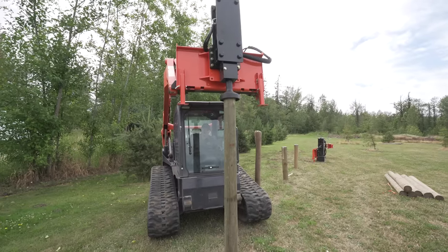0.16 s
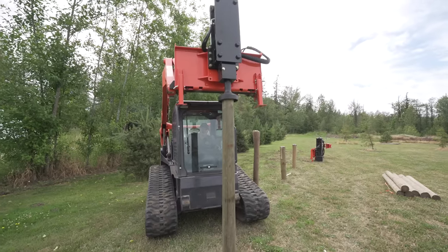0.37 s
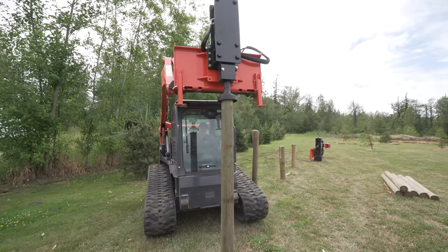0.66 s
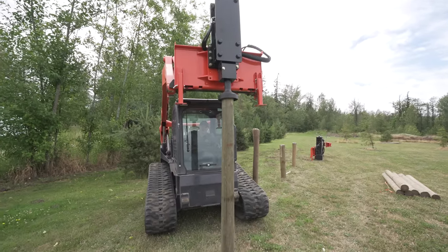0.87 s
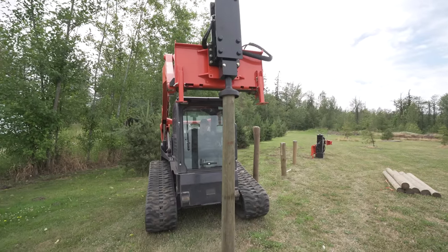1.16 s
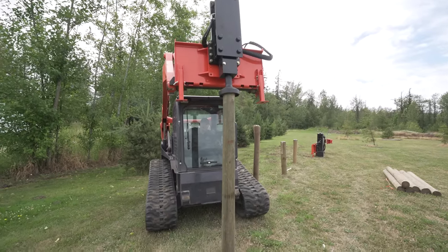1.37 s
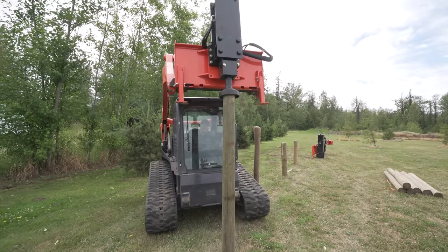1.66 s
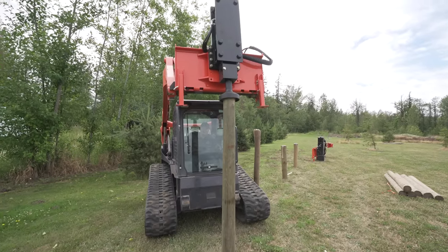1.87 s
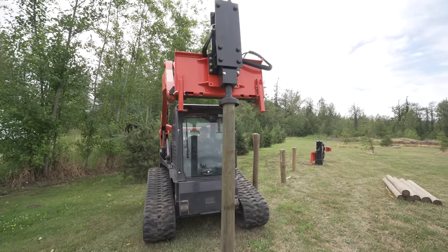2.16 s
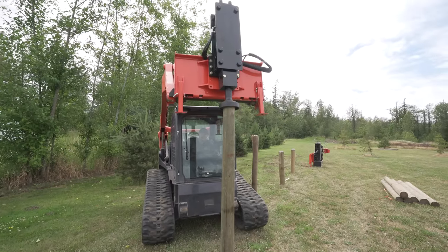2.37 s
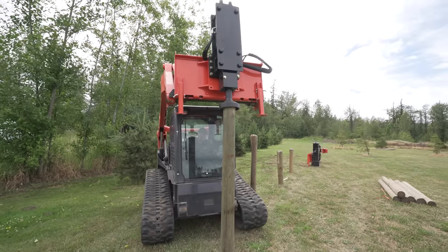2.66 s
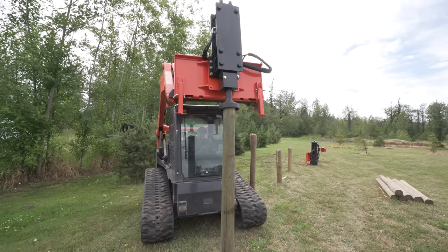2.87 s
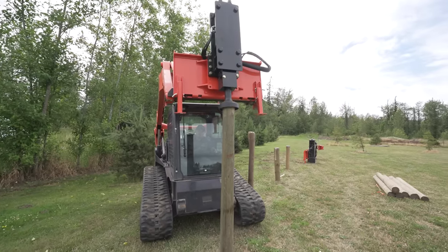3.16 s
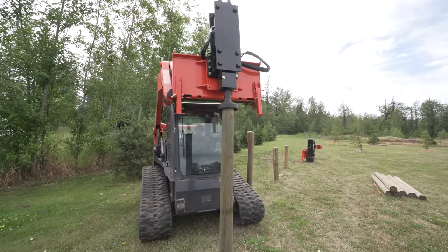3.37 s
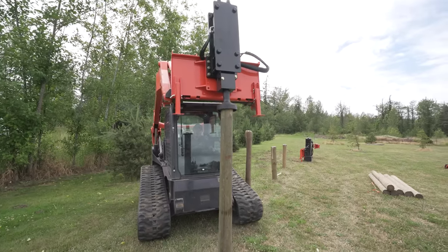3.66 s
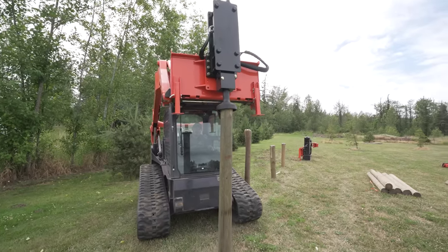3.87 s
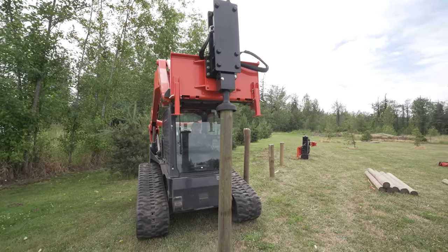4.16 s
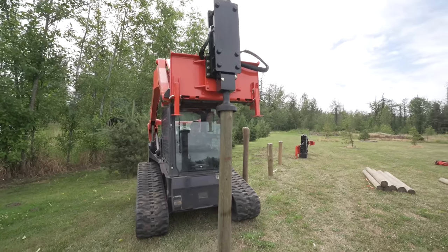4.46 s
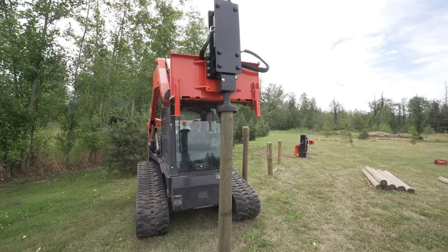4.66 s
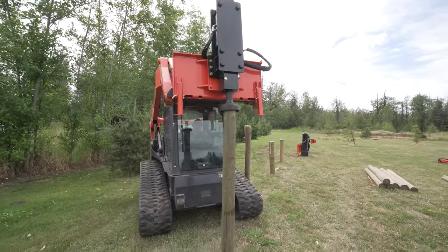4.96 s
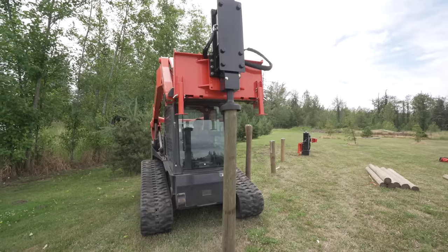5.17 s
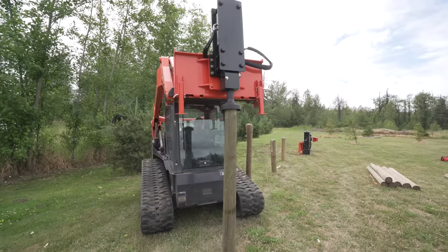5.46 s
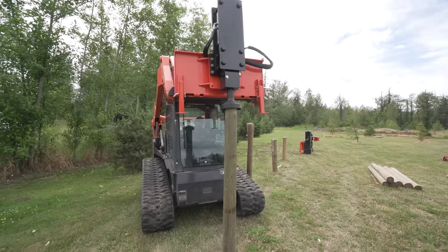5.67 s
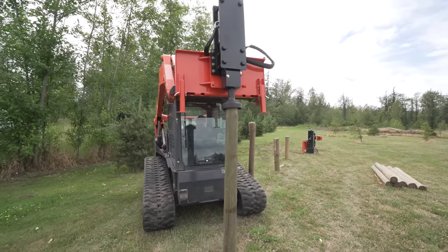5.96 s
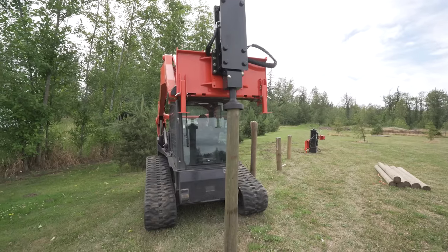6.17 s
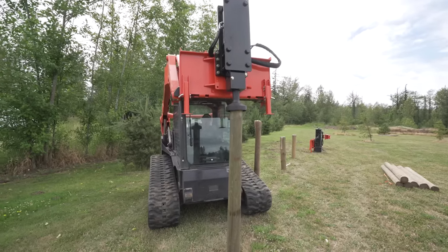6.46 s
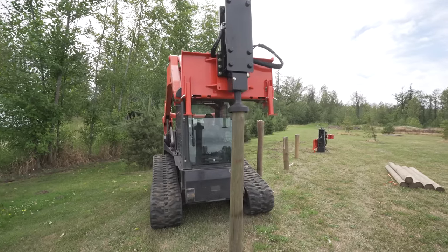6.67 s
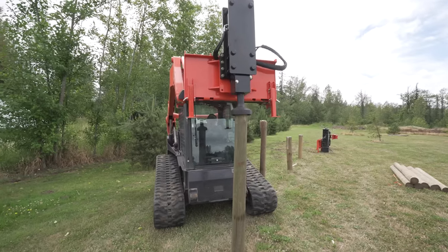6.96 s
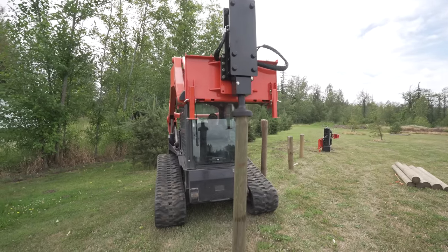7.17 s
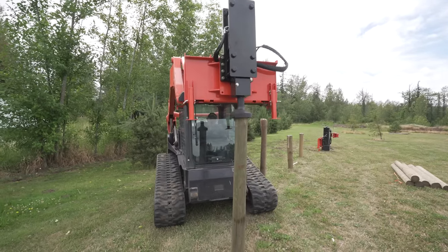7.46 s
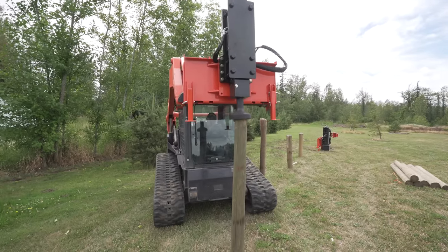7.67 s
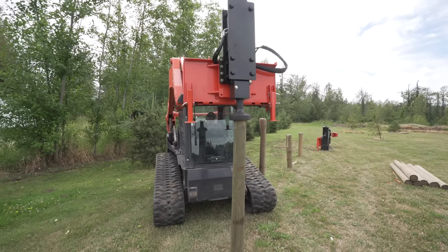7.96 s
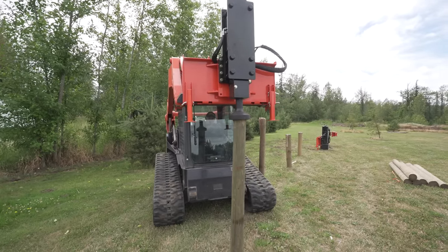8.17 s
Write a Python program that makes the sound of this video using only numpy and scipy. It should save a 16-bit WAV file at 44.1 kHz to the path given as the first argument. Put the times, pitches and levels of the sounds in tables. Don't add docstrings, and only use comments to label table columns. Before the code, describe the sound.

Outdoors and fairly close, a hydraulic hammer on a loader pounds a post in rapid clattering metal blows. A short burst stops, steel rings out over a low diesel idle and falling pump whine, then a long louder burst follows. After two separate blows and a pause, a final burst runs nearly to the end, finishing with loose clanks and ringing.

```python
import sys
import numpy as np
from scipy import signal
from scipy.fft import rfft, irfft, next_fast_len
from scipy.io import wavfile

SR = 44100
rng = np.random.default_rng(int(sys.argv[2]) if len(sys.argv) > 2 else 0)


def gain_from_db(level_db):
    decades = np.asarray(level_db, float) / 20
    return 10 ** decades


def pcm_store(signal):
    levels = np.round(np.clip(np.atleast_2d(signal), -1, 1) * 32767)
    wavfile.write(sys.argv[1], SR, levels.astype(np.int16).T)


N = 367353


def rms_one(x):
    return x / np.sqrt(np.mean(x ** 2) + 1e-20)


def in_time(rows, s=None):
    at, *columns = np.transpose(rows)
    when = np.arange(N) / SR if s is None else s
    return [np.interp(when, at, column) for column in columns]


def at_hz(points, hz):
    points_hz, values = np.array(points)[:, 0], np.array(points)[:, 1]
    return np.interp(np.log(hz), np.log(points_hz), values)


def resonate(x, hz, width_hz):
    r = np.exp(-np.pi * width_hz / SR)
    zeros = np.array([1, 0, -1]) * (1 - r * r) / 2
    return signal.lfilter(zeros, [1, -2 * r * np.cos(2 * np.pi * hz / SR), r * r], x)


def add(out, start_s, piece):
    i = round(start_s * SR)
    out[..., max(i, 0):i + piece.shape[-1]] += piece[..., max(-i, 0):N - i]


def attack(t, rise_s):
    return np.clip(t / rise_s, 0, 1)


def fade(t, t60):
    return gain_from_db(-60 * np.maximum(t, 0) / t60)


def sides(lean_db):
    return gain_from_db(np.array([lean_db / 2, -lean_db / 2]))


# pitch_hz, likeness (0 to 1)
LIKENESS = [(60, .98), (300, .5), (700, .85), (3000, .91), (5500, .55), (9000, .4), (13000, .4)]
# pitch_hz, left_over_right_db
LEAN = [(60, -0.5), (150, -1), (380, -0.5), (950, -1), (2380, 0.5), (5980, -3), (9000, -4), (15000, 0)]


def tones(hz, rms_db, envelope, t):
    start = rng.random((len(hz), 1)) * (hz[:, None] > 500)
    phase = 2 * np.pi * ((hz[:, None] * t + start) % 1).astype(np.float32)
    lag = (1 - at_hz(LIKENESS, hz))[:, None] * rng.normal(1.5 * np.sin(hz), .4)[:, None]
    lag = lag.astype(np.float32)
    level = (np.sqrt(2) * gain_from_db(rms_db)[:, None] * envelope).astype(np.float32)
    left, right = sides(at_hz(LEAN, hz))
    return np.array([left @ (level * np.sin(phase + lag)), right @ (level * np.sin(phase - lag))])


def banded(white, spectrum, envelope_at):
    white = rms_one(white)
    edges = 30 * 2 ** np.arange(0, 9.1, .411)
    centres = np.sqrt(edges[1:] * edges[:-1])
    total = np.sqrt(np.sum(gain_from_db(2 * at_hz(spectrum, centres)) * np.diff(edges)) * 2 / SR)
    out = 0
    for k, hz in enumerate(centres):
        sos = signal.butter(2, edges[k:k + 2], "band", fs=SR, output="sos")
        mid, side = signal.sosfilt(sos, white[k % 2] * envelope_at(hz))
        alike = np.clip(at_hz(LIKENESS, hz), 0, 1)
        pair = np.sqrt(1 + alike) * mid + np.sqrt(1 - alike) * side * [[1], [-1]]
        gains = sides(at_hz(LEAN, hz))[:, None] / np.sqrt(2)
        out = out + gain_from_db(at_hz(spectrum, hz)) / total * pair * gains
    return out


# time_s, exhaust_db, fan_and_field_db
IDLE = [(1.1, -49, -49.5), (1.6, -55, -53), (1.95, -58, -47), (2.2, -41, -40.5), (4.7, -37.5, -59),
        (4.9, -55, -55), (5.6, -56, -54), (5.95, -67.5, -52), (8.33, -56, -54)]
# pitch_hz, level_db (per Hz)
FIELD = [(20, -44), (54, -7.5), (90, -4.5), (160, -9), (400, -12), (1200, -22), (2500, -27.5), (4300, -33),
         (5400, -39), (6500, -37.5), (8000, -45.5), (12000, -58)]


def field():
    size = next_fast_len(N)
    hz = np.maximum(np.fft.rfftfreq(size, 1 / SR), 1)
    shaped = rfft(rng.standard_normal((2, size))) * gain_from_db(at_hz(FIELD, hz))
    mid, side = irfft(shaped, size)[:, :N]
    return gain_from_db(in_time(IDLE)[1]) * rms_one(mid + 0.15 * side * [[1], [-1]])


# time_s, firing_hz, firing_tone_db, fan_tone_db
REVS = [(0, 53.83, -47.5, -45.5), (.9, 56.02, -50, -51.5), (1.1, 61.96, -58, -53.5),
        (1.35, 56.1, -59.5, -54), (4.7, 58.04, -52, -55.5), (4.95, 68.2, -66, -51.5),
        (5.8, 67.7, -63, -60.5), (6.2, 54.1, -54, -65.5), (7.8, 54.8, -54, -68), (8.15, 66.7, -59, -71)]
# pitch_hz, width_hz, level_db
EXHAUST = [(59, 50, -0.5), (203, 54, 3), (411, 74, -9.5)]
# pitch_hz, level_db
FAN_TONES = [(231, -2), (187, -5)]


def diesel():
    level_db, (hz, tone_db, fan_db) = in_time(IDLE)[0], in_time(REVS)
    turns = np.cumsum(hz) / SR
    count = turns.astype(int)
    strength = gain_from_db(rng.normal(0, 2.5, 600))
    pulses = np.diff(count, prepend=0) * strength[count] + 0.077 * rng.standard_normal(N)
    exhaust = 0
    for f, width, db in EXHAUST:
        exhaust = exhaust + gain_from_db(db) * rms_one(resonate(resonate(pulses, f, width), f, 2 * width))
    firing = np.sqrt(2) * gain_from_db(tone_db) * np.sin(2 * np.pi * turns)
    t = np.arange(N) / SR
    fan = sum(gain_from_db(db) * np.sqrt(2) * np.sin(2 * np.pi * f * t) for f, db in FAN_TONES)
    return gain_from_db(level_db) * rms_one(exhaust) + firing + gain_from_db(fan_db) * fan


# time_s, pitch_hz, level_db
WHINE = [
    [(1.0, 1174, -42), (1.15, 1180, -50), (1.31, 1170, -35.5), (1.41, 1167, -48.5), (1.56, 1124, -62),
     (1.65, 1120, -79)],
    [(4.82, 1164, -35), (4.9, 1160, -46), (4.97, 1198, -51), (5.17, 1210, -59), (5.24, 1200, -50)],
    [(1.85, 1154, -65), (1.91, 1150, -59), (1.97, 1230, -62)],
]
# time_s, pitch_hz, level_db
PRESSURE = [(1.85, 4400, -80), (1.865, 4360, -62), (1.92, 4600, -61), (1.94, 5050, -55), (1.96, 5040, -53),
            (1.97, 5200, -45)]
# time_s, pitch_hz, level_db
SECOND_PRESSURE = [(5.89, 4500, -84), (5.93, 4550, -75), (5.95, 4700, -64), (5.985, 4900, -52)]


def hydraulics():
    out = np.zeros(N)
    for rows in WHINE:
        t = np.arange(rows[0][0], rows[-1][0], 1 / SR)
        hz, db = in_time(rows, t)
        edges = attack(np.minimum(t - t[0], t[-1] - t), 0.009)
        add(out, t[0], np.sqrt(2) * gain_from_db(db) * edges * np.sin(2 * np.pi * np.cumsum(hz) / SR))
    for rows in PRESSURE, SECOND_PRESSURE:
        t = np.arange(rows[0][0], rows[-1][0], 1 / SR)
        hz, db = in_time(rows, t)
        # pitch_hz, width_hz, level_db; only the second glides
        bands = [(3100, 200, -2), (hz, 120, 2.5), (6400, 1500, -3),
                 (8150, 600, -4), (11000, 2500, -8), (14300, 2500, -12)]
        for centre_hz, width_hz, rel_db in bands:
            sos = signal.butter(2, width_hz / 2, fs=SR, output="sos")
            slow = rms_one(signal.sosfilt(sos, rng.standard_normal(len(t))))
            carrier = np.sin(2 * np.pi * np.cumsum(centre_hz + 0 * t) / SR)
            add(out, t[0], gain_from_db(db + rel_db) * slow * carrier)
    return out


# start_s, level_db
THUDS = [
    (5.715, -33),
    (5.746, -30),
]


def thuds():
    out, t = np.zeros(N), np.arange(SR // 20) / SR
    for s, db in THUDS:
        add(out, s, gain_from_db(db) * fade(t, 0.023) * np.sin(2 * np.pi * 140 * t))
    return out


FRAME_HZ = [931, 1195, 1335, 1389, 2105, 2514, 3660, 4527, 5545, 6264, 6751, 7044, 7109, 8525, 8958, 9370,
            9822, 11230, 11421, 10010, 10710, 11900, 12730, 13660, 14840]
FRAME_T60 = [2.4, 1.8, 0.76, 0.31, 0.53, 1.04, 1.6, 0.99, 0.48, 2, 1.08, 1.07, 0.84, 0.75, 2.1, 0.73, .25,
             1.5, 0.64, .26, .3, 0.41, .6, 1.2, 0.35]
FRAME_DB = [-56.5, -51, -38.5, -41, -46, -48.5, -64, -45, -62, -50, -46.5, -55.5, -45.5, -54, -70, -59, -54,
            -61.5, -65, -58, -65, -68, -68, -74, -70]
FRAME_PART = [1, 0, 3, 4, 1, 2, 0, 5, 2, 3, 1, 2, 1, 1, 0, 0, 0, 0, 0, 0, 0, 0, 0, 0, 0]
# start_s, boom_db, plate_db, bracket_db, guard_db, pin_db
RING_OUT = [
    (.97, 4, -1, -9, 10, -19),
    (4.839, -9, 6.5, -11.5, -38, -12),
    (5.491, -5.5, -2, -12, -30, -13),
    (8.029, -18, -18, -5, -27, -4),
]


def frame():
    out, t, hz = np.zeros((2, N)), np.arange(SR) / SR, np.array(FRAME_HZ)
    envelope = attack(t, 0.0082) * fade(t, np.array(FRAME_T60)[:, None]) * attack(1 - t, .1)
    knots = np.linspace(0, 1, 24)
    for s, *parts_db in RING_OUT:
        db = FRAME_DB + np.r_[0, parts_db][FRAME_PART]
        play_db = rng.normal(0, 2.1, (len(hz), 24))
        flutter = gain_from_db([np.interp(t, knots, row) for row in play_db])
        add(out, s - .02, tones(hz, db, envelope * flutter, t))
        add(out, s - .02, tones(hz[:13] + 21, db[:13] - 10.5, envelope[:13], t))
    return out


# start_s, clatter_db, clatter_change_db (per 35 ms, until landing), cup_high_db,
# cup_low_db
FIRST_BURST = [(0.008, -25, 2, -35, -34), (0.0822, -23.5, 0.5, -37, -37), (0.155, -23, 0, -39, -28),
               (0.2289, -23.0, 0.5, -33, -30), (0.3013, -23.5, 1, -41, -28.5),
               (0.3745, -20.5, -2, -42, -32), (0.4481, -21, -0.5, -35, -27.5),
               (0.5212, -22.5, 1, -33, -30.5), (0.5943, -23, 1.0, -40, -32.5), (0.667, -23.5, 2, -37, -34),
               (0.74, -21, 0, -41.5, -38), (0.812, -22.5, 0, -35, -35.5), (0.8848, -19.5, -4, -36, -28.5)]
SECOND_BURST = [(1.983, -21.5, 1.5, -43, -29.5), (2.071, -23, 1.5, -31.0, -35.5),
                (2.151, -20.5, -0.5, -39, -31.5), (2.2272, -20.5, -1, -31, -29.0),
                (2.3054, -21.5, 0.5, -32, -31.0), (2.379, -21, -0.5, -32, -27.5),
                (2.4532, -21, -0.0, -29, -31.5), (2.5241, -20.5, 0.5, -31, -25.5),
                (2.596, -21.0, 0.5, -40, -24.0), (2.667, -21, 0.5, -36, -26.5),
                (2.7368, -20, -0.5, -40, -26.0), (2.8069, -21, 0, -34, -27),
                (2.877, -19.5, 0.5, -34, -29.5), (2.9468, -19, -1, -47, -28),
                (3.0162, -19.5, 0.5, -36, -34), (3.0874, -19, -0.5, -38, -26),
                (3.1588, -20.5, 0, -31.5, -34), (3.2276, -17.5, -1.5, -44, -25.5),
                (3.2982, -18.5, -1, -41, -25), (3.3684, -19.5, 1, -42.5, -24),
                (3.4366, -19.0, 0.5, -42, -25), (3.5065, -19, 1, -45.5, -24), (3.5765, -18, -0.5, -42, -48),
                (3.6476, -17, -4.5, -31.5, -25.5), (3.7164, -17, -1, -30, -30.5),
                (3.786, -18.5, -1, -43.5, -27.0), (3.8554, -16.5, -1.5, -39, -26.5),
                (3.926, -20, -1, -34, -23.5), (3.994, -20, 1, -35, -28.5), (4.065, -17.5, -2, -46, -24.0),
                (4.1338, -19, 0, -31.5, -34), (4.2048, -17, -4, -32, -30.5),
                (4.274, -17.5, -1.5, -33, -31.5), (4.3451, -16.5, -3.5, -34, -29),
                (4.4151, -17, -2, -28, -25), (4.4841, -20.5, -1, -33.5, -30.5),
                (4.557, -19.5, -2, -32.5, -30.0), (4.6238, -19.5, -2, -41, -31.5),
                (4.6946, -20.5, 1, -31.5, -35.0), (4.7651, -17.5, -6.5, -35, -37)]
SINGLE_BLOWS = [
    (5.2465, -18.5, -2.0, -33, -30.5),
    (5.402, -17.5, -3.5, -34, -29),
]
LAST_BURST = [(5.993, -18, -4, -43, -31), (6.0774, -19.5, 1, -28, -31), (6.1525, -15.5, -5, -31, -34),
              (6.2278, -17.5, -2, -35.0, -28.5), (6.2999, -16.5, -4.5, -34.0, -27),
              (6.373, -18.5, -0.5, -32, -30.5), (6.4443, -17.5, -2.5, -33, -28.5),
              (6.5156, -20, 1, -27.5, -35), (6.5864, -17.5, -5, -56, -25.5), (6.66, -19.5, 0, -23, -30.5),
              (6.7288, -18, -5, -40, -34), (6.8005, -19.5, -1.5, -23.5, -28.5),
              (6.8686, -16.5, -5.5, -25, -32), (6.9409, -18, -2, -16.5, -37), (7.0116, -17, -4, -30, -28.5),
              (7.0826, -16, -6, -17.5, -36), (7.153, -17.5, -3, -36, -35), (7.2229, -21, 1, -22, -39.0),
              (7.2924, -22.5, 2.5, -20.5, -29.5), (7.366, -19, -2, -25, -40), (7.4345, -18, -4, -22, -32),
              (7.5049, -17.5, -2.5, -21.5, -26.5), (7.5766, -18, -4, -26, -25.5),
              (7.6479, -19, -3, -23.5, -22.5), (7.7214, -17.5, -3, -22.5, -26.5),
              (7.7958, -19.5, 1, -21, -32.0), (7.8709, -21, -1, -20.5, -25.5)]
PIPE_RING_DB = [
    [5.5, 7.5, 10.5, 8.5, 8, 1, -2, 0, 4, 4.5, -8, 4.5, 1],
    [7, 4, 8.5, 6, 7.5, 8.5, 5, -3.5, -4, 6, 4.5, 5, 6, 3.5, 0.5, 3.5, 5, -3, 7, 5.5, 7, -3, -9.5, -2, 3.5,
     -7, 5, -6, 3, 7, 7, 6, -3, -6, -2, -3, -1.5, 4, -14, -3],
    [4, -7],
    [4, -9, 6, 4, 7, 0, -1, -3, 3, -1, -18, 1, -7, -17, -8, -13.5, -9, -10, -13, -10, -10, -10, -19, -12,
     -14, -13, -14],
]
# time_s, level_db
STROKE = [(0, -30.5), (.885, -28.5), (1.98, -26.5), (2.75, -27), (3.3, -28), (4.1, -22), (4.764, -23.5),
          (5.3, -26), (6, -27), (6.95, -27.5), (7.3, -28), (7.87, -26.5)]


def strokes():
    blows = np.r_[FIRST_BURST, SECOND_BURST, SINGLE_BLOWS, LAST_BURST]
    s, level_db, change_db, high_db, low_db = blows.T
    piston_db = in_time(STROKE, s)[0] + rng.normal(0, 0.5, len(s))
    return np.c_[s, level_db, change_db, piston_db, high_db, low_db, sum(PIPE_RING_DB, [])]


# time_s, lift_ms, landing_ms, landed_ring_t60_s, far_tail_db
REBOUND = [(0, 14.5, 53.7, 0.066, -20.5), (1.5, 19.4, 71, 0.066, -5.5), (2, 16, 59.4, 0.04, -23.5),
           (4.8, 16.5, 49.2, 0.13, -19.5), (5.3, 24, 49.3, 0.16, -14), (6.4, 22., 44.3, 0.083, -34),
           (6.9, 21.3, 48, 0.75, -17), (8, 22, 42, 1, -20.5)]


def clanks(blows):
    out, t = np.zeros((2, N)), np.arange(SR // 30) / SR
    envelope = (1 - np.exp(-t / .0015)) * fade(t, .028)
    for s, level_db, *_ in blows:
        lift, land = np.array(in_time(REBOUND, s)[:2]) / 1000
        for when, pitch, size in rng.random((9, 3)):
            start_s = s + lift / 2 + when * (land - lift / 2)
            hz, db = np.array([1400 * 3.6 ** pitch]), np.array([level_db - 7.5 - 8 * size])
            add(out, start_s, tones(hz, db, envelope, t))
    return out


# time_s, crack_over_clatter_db, crack_t60_s, valve_tick_db, piston_damping_at_rebound_db
BITE = [(0, 18, 0.009, -9.5, 32), (.9, 16.5, 0.0062, -34.5, 21), (2, 17, 0.008, -11.5, 27),
        (3.4, 15, 0.0078, -34, 17), (4.2, 8, 0.021, -24, 7), (4.75, 6, 0.027, -21, 15),
        (5.2, 7.5, 0.022, -21.5, 8.5), (6, 2, 0.018, -17.5, 7.5), (7.9, 13, 0.024, -18.5, 6.5)]
MAIN_HZ = [3678, 3590, 2600, 6266, 603, 9368, 11421, 800, 1170, 6550, 1090, 1662]
CUP_HZ = [2220, 2440, 2810, 2973, 3207, 4170, 4440, 6780, 7045, 7880, 8678, 9884, 11852, 12730, 13249,
          14600]
CUP_DB = [-15, -29.5, -15.5, -5, -17, -7, -14.5, -19.5, -20, -6.5, -23.5, -18.5, -14, -27.5, -21.5, -30]
# time_s, near_9_khz_db, near_11_khz_db
CUP_RINGS = [(0, -38.5, -47.5), (.85, -37, -57), (2, -40, -45), (3.4, -42.5, -45.5), (4.2, -30, -45),
             (4.8, -32.5, -42.5), (5.3, -34, -44), (6, -36.5, -46.5), (6.7, -31, -39.5),
             (7.3, -33.5, -39.5), (7.6, -35, -34.5), (7.87, -37, -30.5)]
# time_s, thump_db, thump_hz, near_800_and_1100_hz_db,
# near_1700_hz_db
POST = [(0, -31.5, 99, -31, -28.5), (.5, -28.5, 99.7, -30.5, -26), (2, -24, 187, -31.5, -25),
        (2.6, -37.5, 190.3, -28.5, -22), (4.2, -26.5, 196.5, -30.5, -22), (5.3, -36.5, 224.6, -33, -27),
        (6, -22.5, 193, -36, -22), (7.3, -25.5, 185.4, -49.5, -14.5), (7.6, -19.5, 196, -50, -20.5)]
# start_s, level_db
LOOSE_CUP = [
    (.905, -25.5),
    (2.225, -27),
    (4.785, -28.5),
    (5.27, -36),
]
# start_s, level_db, t60_s
SETTLING = [
    (7.925, -26, 0.3),
    (7.971, -21, 0.13),
    (7.998, -21.5, 0.07),
]
# pitch_hz, level_db (against the knock)
SETTLING_RINGS = [(603, -15), (3800, -2.5), (6266, -7), (7045, -1.5), (11421, -14)]


def rings(blows):
    out, t = np.zeros((2, N)), np.arange(SR // 7) / SR
    cup_hz = np.array(CUP_HZ)[:, None]
    short = fade(t, np.array([[.05], [.11], [.04], [.05], [.12]])) * (1 - np.exp(-t / 0.00086))
    cup_decay = fade(t, 0.092 * (cup_hz / 4000) ** 0.081)
    for s, level_db, change_db, piston_db, high_db, low_db, swell_db in blows:
        lift, land, landed_t60 = np.array(in_time(REBOUND, s)[:3]) / [1000, 1000, 1]
        upper_db, top_db = in_time(CUP_RINGS, s)
        thump_db, thump_hz, pipe_db, knock_db = in_time(POST, s)
        crack_db, _, _, damping_db = in_time(BITE, s)
        seated = fade(t - land, landed_t60) * attack(t[-1] - t, 0.023)
        struck = (1 - np.exp(-t / 0.0032)) * seated
        flying = (0.5 + 1.19 * attack(t - lift, 0.0016)) * struck
        piston = (1 - np.exp(-t / 0.0007)) * seated * fade(t, 0.7)
        piston = piston * gain_from_db(-damping_db * attack(t - lift, 0.0057))
        chatter_db = rng.normal(0, 2.0, 30)
        piston = piston * gain_from_db(np.interp(t, np.linspace(0, t[-1], num=30), chatter_db))
        low = flying * fade(t - land, 0.17)
        swell = struck * (0.26 + 1.9 * attack(t, 0.068) ** 2)
        beat = struck * attack(t - .007, 0.0009) * fade(t - .008, 0.026)
        lifts = lift * rng.uniform(0.68, 1.87, (len(CUP_HZ), 1)) * np.where(cup_hz > 8300, .3, 1)
        lesser = struck * (0.08 + 4.9 * attack(t - lifts, 0.0018)) * cup_decay
        envelope = np.vstack([
            piston, piston * fade(t, 0.048), fade(t, 0.0083) * (1 - np.exp(-t / .0004)),
            struck * fade(t, 0.37), low, flying * fade(t, 0.11), flying * fade(t, .5),
            low, swell, beat, short, lesser])
        hz = np.r_[MAIN_HZ, thump_hz, 1.5 * thump_hz, 58, CUP_HZ]
        hz = hz * rng.normal(1, 0.000607 + .008 * (hz < 1000))
        main_db = [
            piston_db + 9.5, piston_db + 1.5, level_db + crack_db - 9.5,
            high_db + 8.5, low_db - 1.0, upper_db + 19.0, top_db + 9.5,
            pipe_db - 7.5, 1.56 * swell_db - 36.5, level_db + 7.5 - 7.9 * (s > 6.9),
            pipe_db + 14.0, knock_db, thump_db, thump_db - 2.5, -38]
        spread_db = np.r_[np.zeros(5), 2.2, 2.2, 3.5, 0, np.full(len(hz) - 9, 3.5)]
        scatter_db = rng.normal(0, 1, len(hz)) * spread_db
        add(out, s, tones(hz, np.r_[main_db, level_db + np.array(CUP_DB)] + scatter_db, envelope, t))
    for s, db in LOOSE_CUP:
        swing = attack(t, .008) * fade(t - .045, 0.034)
        add(out, s, tones(np.array([795.]), np.array([db]), swing, t))
    hz, ring_db = np.transpose(SETTLING_RINGS)
    for s, level_db, t60 in SETTLING:
        knock = fade(t, min(1.2 * t60, .15)) * attack(t, 0.0029)
        add(out, s, tones(hz, level_db + ring_db, knock, t))
    return out


def contacts(blows, grain_db, repeat, repeat_s):
    white = rng.standard_normal((2, 2, N))
    white = white * gain_from_db(grain_db * np.minimum(rng.exponential(1, N), 6))
    n = np.arange(SR // 20)
    share = np.clip(repeat, 0, 1) * np.exp(-n / (repeat_s * SR))
    for s, *_ in blows:
        at = round(s * SR) + n
        white[..., at] = np.sqrt(1 - share) * white[..., at] + np.sqrt(share) * white[..., N - 1 - n]
    return white


# pitch_hz, width_hz, level_db
HOUSING = [(803.5, 57, 12), (1170, 81, 6.5), (1356, 65, 2), (1765, 100, 5), (2324, 55, 8), (4150, 510, 1.5),
           (6130, 370, 11.5), (6960, 120, 10.5)]
# pitch_hz, width_hz
NOTCHES = [(960, 7.7), (1510, 260), (4950, 550), (10500, 470)]


def plates(x, count, width_hz, ring_db):
    t = np.arange(SR // 8) / SR
    spread_hz = np.geomspace(1900, 15500, count) * rng.normal(1, .012, count)
    comb_hz = np.r_[CUP_HZ, FRAME_HZ[4:], spread_hz]
    comb_db = rng.normal(ring_db, 1.5, len(comb_hz))
    narrow = np.c_[comb_hz, np.full(len(comb_hz), width_hz), comb_db]
    hz, width, db = np.r_[HOUSING, narrow].T
    dip_hz, dip_width = np.transpose(NOTCHES)
    hz, width = np.r_[hz, dip_hz], np.r_[width, dip_width]
    gain = np.r_[gain_from_db(db), np.full(len(dip_hz), -.8)]
    modes = np.exp(-np.pi * width[:, None] * t) * np.cos(2 * np.pi * hz[:, None] * t)
    response = (2 * np.pi * width / SR * gain) @ modes
    return x + signal.oaconvolve(x, response[None])[:, :N]


# pitch_hz, level_db (per Hz)
CLATTER = [(24, -49.5), (50, -11.5), (155, -17.5), (330, -10), (538, -11), (610, -5), (909, -18),
           (1170, -1), (1500, -8.5), (3590, -7), (4400, -10.5), (5100, -15.5), (6390, -12.5), (11600, -10),
           (15700, -13)]
# pitch_hz, t60_s
CLATTER_T60 = [(100, .5), (1000, 0.76), (4000, 0.37), (5300, 0.4), (6700, 1), (7700, .3), (9000, .27),
               (14000, .12)]
# start_s, level_db, t60_s
SLACK_KNOCKS = [
    (0.1, -32.5, 0.11),
    (0.0054, -13, 0.059),
]


def clatter(blows):
    crack, body = np.zeros(N) + 1e-9, np.zeros(N) + 1e-9
    fade_db, tick = np.zeros(N), np.zeros(N)
    t = np.arange(SR // 5) / SR
    for s, level_db, change_db, *_ in blows:
        lift, land = np.array(in_time(REBOUND, s)[:2]) / 1000
        crack_db, crack_t60, valve_db = in_time(BITE, s)[:3]
        i = round(s * SR)
        add(crack, s, gain_from_db(level_db + crack_db) * fade(t, crack_t60) * attack(t, 0.0007))
        add(crack, s + lift, gain_from_db(level_db - 2.0 + rng.normal(0, 2.6)) * fade(t, 0.04))
        add(tick, s - .014, gain_from_db(valve_db) * fade(t, 0.096) * attack(t, 0.0028))
        body[i:i + len(t)] = (gain_from_db(level_db + 2.0) * fade(t - land, 0.13))[:N - i]
        fade_db[i:i + len(t)] = (change_db * np.minimum(t, land) / 0.035)[:N - i]
    for s, level_db, t60 in SLACK_KNOCKS:
        add(crack, s, gain_from_db(level_db - 4.5) * fade(t, t60) * attack(t, 0.0059))
    for s, level_db, t60 in SETTLING:
        add(body, s, gain_from_db(level_db) * fade(t, t60) * attack(t, 0.0027) * (1 - t / t[-1]))
    far_gain = gain_from_db(in_time(REBOUND)[3])

    def envelope_at(hz):
        lumps = np.repeat(gain_from_db(rng.normal(0, 3.0, N // 260 + 1)), 260)[:N]
        dulling = gain_from_db(-11 * np.clip(np.log2(hz / 7000), 0, 2))
        change = np.exp(fade_db * ((hz / 2300) ** 0.041 * np.log(10) / 20))
        near = lumps * body * change * dulling + crack * dulling ** .75 + tick * dulling ** 0.96
        r = gain_from_db(-120 / (at_hz(CLATTER_T60, hz) * SR))
        far = signal.lfilter([1 - r], [1, -r], near ** 2)
        return np.sqrt(near ** 2 + far_gain ** 2 * far)

    grains = contacts(blows, grain_db=3.0, repeat=0.92, repeat_s=0.036)
    steel = banded(grains, CLATTER, envelope_at)
    return gain_from_db(-5.5) * plates(steel, count=45, width_hz=18.2, ring_db=3.0)


# time_s, left_over_right_db
DRIFT = [(0, -4.5), (2.6, -4.5), (3.8, -4), (6, -4.5), (7.6, -5.5)]


def scene():
    blows = strokes()
    hammer = clatter(blows) + rings(blows) + clanks(blows) + frame()
    hammer = hammer * sides(in_time(DRIFT)[0] + 3.5)
    return hammer + field() + diesel() + hydraulics() + thuds()


def band_limit(x):
    return signal.sosfilt(signal.butter(12, 16660, fs=SR, output="sos"), x)


def record(dry):
    limited = 0.87 * np.tanh(dry / 0.98)
    top_cut = signal.cheby2(12, 60, 16600, fs=SR, output="sos")
    rumble_cut = signal.butter(2, 42, "high", fs=SR, output="sos")
    mix = signal.sosfilt(np.r_[top_cut, rumble_cut], limited)
    return band_limit(mix)


dry = scene()
out = record(dry)
pcm_store(out)
```